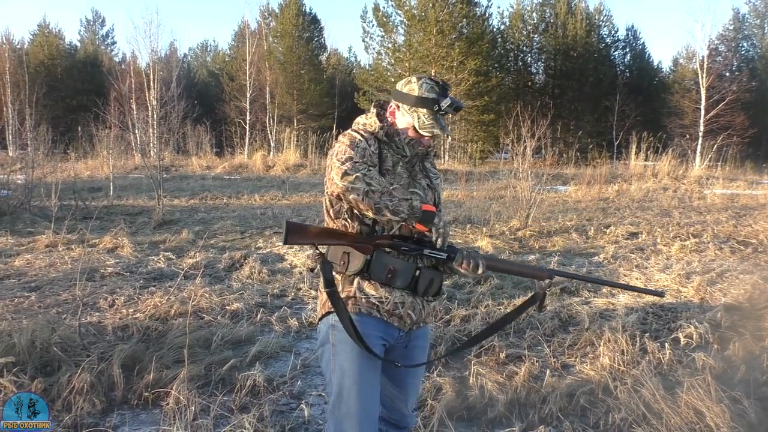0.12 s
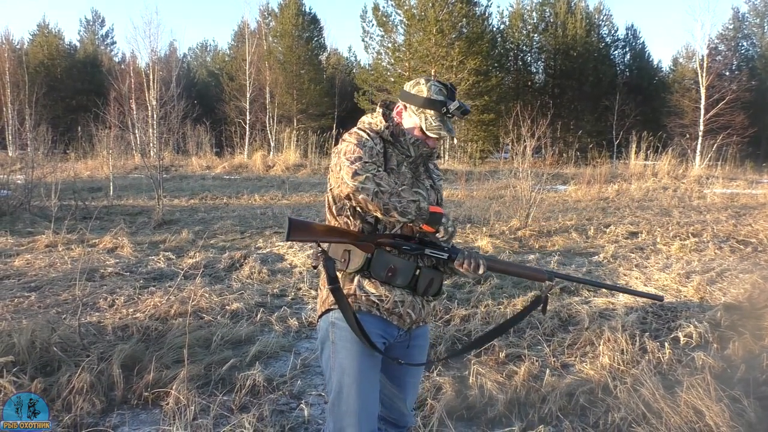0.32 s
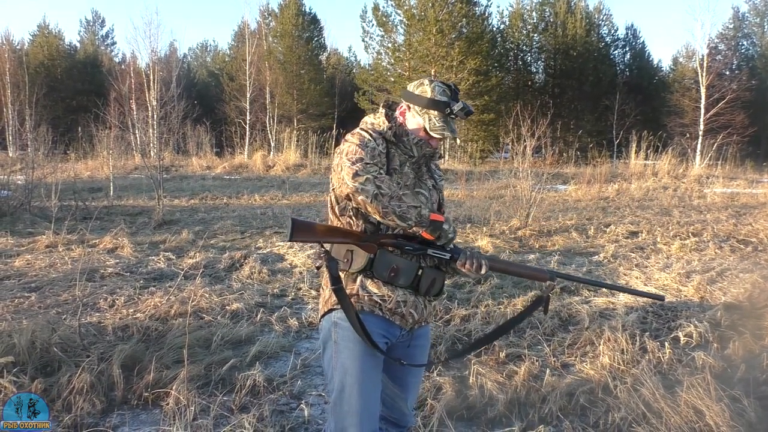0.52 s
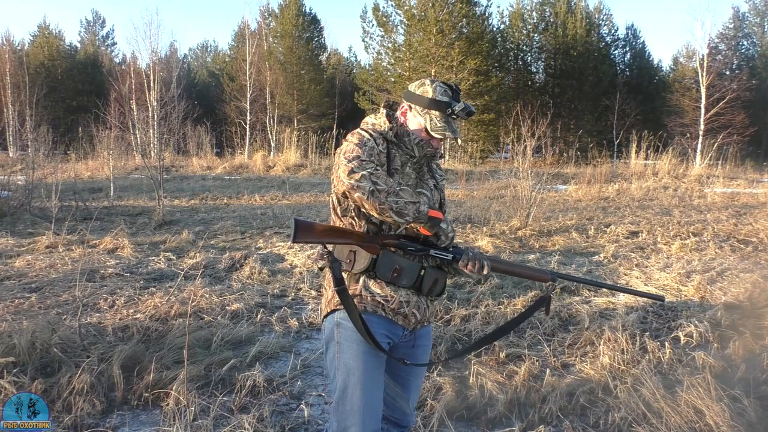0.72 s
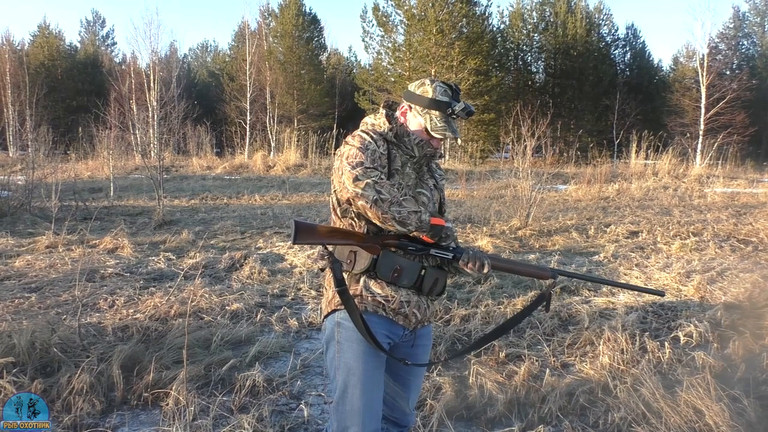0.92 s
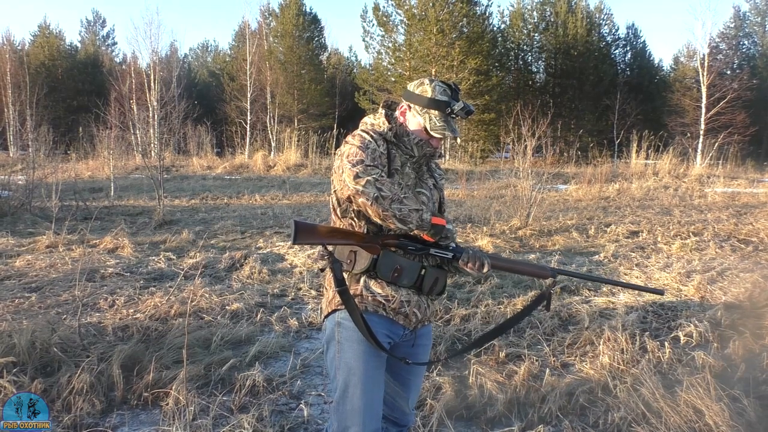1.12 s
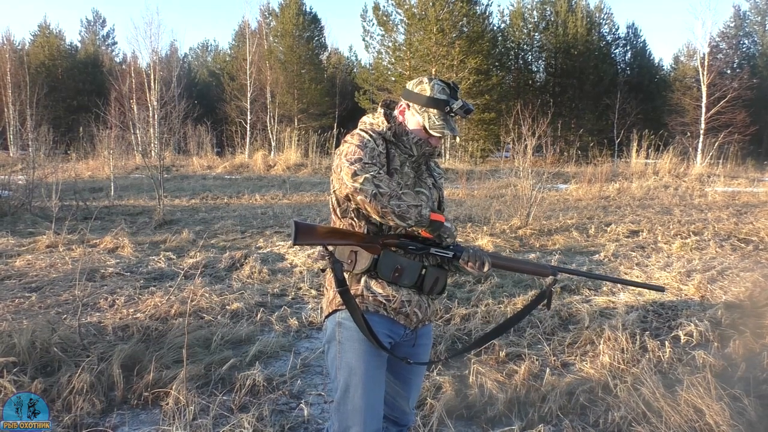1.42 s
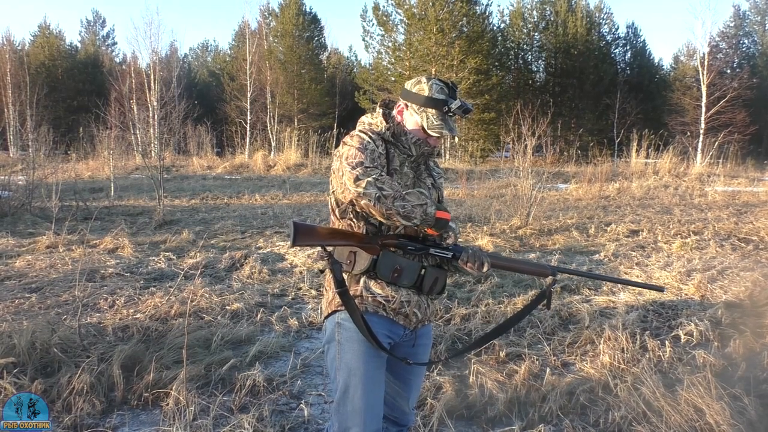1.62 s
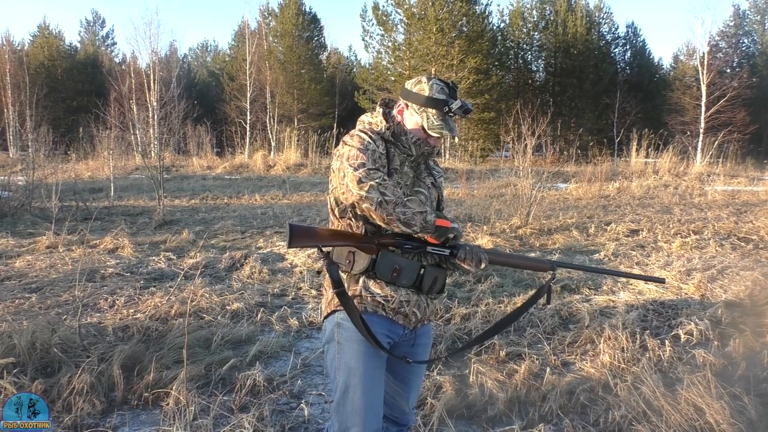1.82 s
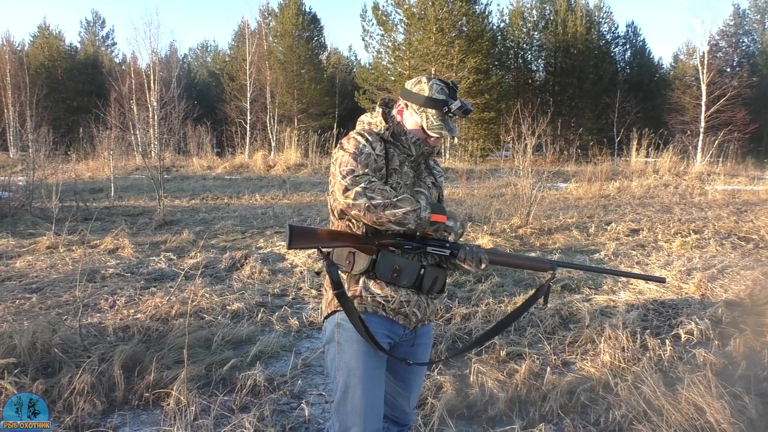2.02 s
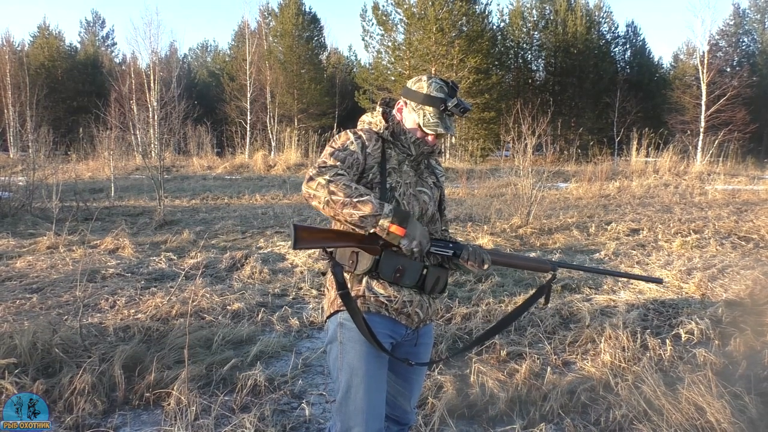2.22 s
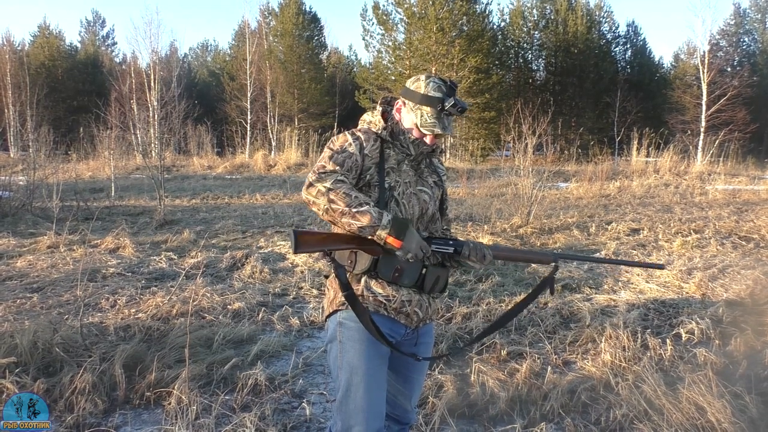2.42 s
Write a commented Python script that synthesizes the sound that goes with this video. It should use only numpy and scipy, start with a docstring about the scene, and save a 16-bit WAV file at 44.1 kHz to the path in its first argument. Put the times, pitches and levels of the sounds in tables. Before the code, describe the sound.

Shotgun handling in an open field, dry and echo-free: soft scrapes and small shell clicks come first, then a sharp snap and a rapid hard clack-clack of the steel action, over low wind buffeting and faint hiss.

```python
"""An open field: a shotgun is handled. Shells rub and tick at the loading port, then the action clacks and slides.
Blows are short bursts of noise and rubs are crowds of tiny catches; both make the steel parts ring briefly.
Single notes sing out of some of the blows, two blows also thump, and a thin ring is fading at the start.
Wind, made of low noise and single puffs, buffets the microphone over a faint steady hiss of filtered noise."""
import sys
import numpy as np
from scipy import signal
from scipy.fft import rfft, irfft
from scipy.io import wavfile
from scipy.ndimage import uniform_filter1d

SR = 44100
rng = np.random.default_rng(int(sys.argv[2]) if len(sys.argv) > 2 else 0)


def wrap_up_sound(samples):
    """Save the sound to the file named by the first command line argument, as 16-bit audio."""
    columns = np.atleast_2d(samples).T
    # keep every value between -1 and 1, then stretch to whole-number steps
    tamed = np.clip(columns, -1, 1)
    steps = np.round(tamed * 32767).astype(np.int16)
    wavfile.write(sys.argv[1], SR, steps)


def gain_from_db(level_db):
    """Convert decibel levels to linear amplitude factors (20 dB per decade)."""
    decades = np.asarray(level_db, float) / 20
    return 10 ** decades


N = 112455  # length of the scene in samples

# colour of the steady hiss (frequency [Hz], relative level [dB])
HISS_COLOUR = [(240, -38), (400, -18), (475, -23), (529, -16.5), (555, -5), (638, 3.5), (858, -10.5),
               (1070, 3), (1650, -8), (2020, -9), (2550, -14.5), (3590, -10.5), (4000, -14.5), (4400, -14),
               (6000, -15.5), (6390, -7), (7580, -9.5), (9420, 0.5), (12900, -0.5), (15700, -7),
               (16500, -22)]
HISS_DB = -61
RUSTLE_DB, RUSTLE_PER_S, RUSTLE_TOP_HZ = 2.2, 8, 7000  # swell of the field rustle, its pace, its upper limit

# rise and fall of the wind (time [s], level [dB])
GUSTS = [(0.0, -45.5), (0.13, -39), (0.4, -36), (0.92, -32), (1.28, -34.5), (1.46, -31), (1.6, -33),
         (1.91, -36), (2.09, -41.5), (2.27, -37.5), (2.4, -43), (2.55, -35.5)]
# colour of the wind on the microphone (frequency [Hz], relative level [dB])
WIND_COLOUR = [(11, -58), (18, 0.5), (37, -18), (87, 1), (178, -2), (296, -17.5), (346, -25.5), (421, -57),
               (458, -45), (520, -73.5), (680, -98.5), (1140, -120)]
# single puffs of wind (centre [s], level before the microphone's low cut [dB], frequency [Hz], length [cycles])
WIND_PUFFS = [(0.211, -21, 124, 0.74), (0.323, -22.5, 134, 0.64), (0.39, -17.5, 141, 0.75),
              (0.403, -19.5, 131, 0.69), (0.481, -19.5, 135, 0.96), (0.506, -24.5, 156, 0.75),
              (0.523, -20.5, 155, 0.77), (0.589, -25.5, 126, 2.9), (0.642, -41, 120, 0.32),
              (0.741, -20, 154, 2.27), (0.761, -16, 137, 0.53), (0.781, -24.5, 184, 3.8),
              (0.841, -18, 143, 1.25), (0.875, -21.5, 153, 1.3), (0.889, -15.5, 144, 1.2),
              (0.907, -13, 159, 0.63), (0.93, -15, 167, 1.5), (0.951, -15.5, 95, 0.28),
              (0.967, -20, 157, 2.1), (0.985, -24, 99, 0.39), (1.014, -24, 174, 2), (1.043, -34, 105, 0.6),
              (1.115, -29, 157, 0.6), (1.148, -26.5, 161, 1), (1.189, -25, 165, 0.7),
              (1.213, -23, 116, 1.23), (1.248, -18, 151, 0.74), (1.266, -19, 121, 0.89),
              (1.299, -25.5, 120, 0.4), (1.328, -19.4, 103, 1.47), (1.39, -24, 139, 0.5),
              (1.407, -26.5, 147, 2.3), (1.431, -23, 133, 0.78), (1.461, -15, 112, 0.95),
              (1.488, -19.5, 105, 0.86), (1.508, -23.8, 138, 1.3), (1.535, -21.5, 147, 0.59),
              (1.547, -23.5, 110, 1.1), (1.584, -23.5, 174, 1), (1.607, -26, 135, 0.91),
              (1.641, -18, 153, 0.82), (1.656, -27, 116, 0.64), (1.676, -25, 125, 2),
              (1.777, -23, 130, 0.58), (2.02, -26, 131, 1.23), (2.095, -22, 172, 0.89),
              (2.155, -21.5, 147, 0.53), (2.185, -24, 101, 1.9), (2.201, -25.5, 149, 0.61),
              (2.219, -23.5, 171, 1.05), (2.236, -25, 148, 1.03), (2.266, -32, 100, 0.66),
              (.055, -30, 95, 1.3), (.30, -28, 120, 1.1), (2.40, -33, 150, 1.1), (2.505, -33, 150, 1.1)]
FLUTTER_DB, FLUTTER_PER_S = 2.5, 32
MIC_LOW_HZ = 42  # the microphone halves a puff's strength here

# an earlier blow still fading at the start
FADING_HZ, FADING_DB, FADING_T60_S, FADING_WIDTH_HZ = 3860, -71, .5, 18

# natural notes of the steel receiver, shared by every blow and rub
# (frequency [Hz], level before scatter [dB], time to fall 60 dB [s])
STEEL_MODES = [(1430, -12, .025), (1800, -15, .025), (2304, -22, 0.13), (2620, -1, 0.029),
               (3318, -0.5, 0.024), (3940, -19, 0.023), (4030, -13, .08), (5500, -8, .03),
               (6300, -4, 0.053), (7190, -10, .03), (8580, -16, .18), (9970, -7, .04), (10330, 2.5, 0.012),
               (11400, -6, 0.05)]
MODE_SCATTER_DB = 1.5
PAIR_SPLIT_HZ, PAIR_SPREAD_HZ = 52.5, 35  # each mode is a close beating pair: mean split and its scatter
RING_LOW_HZ = 900  # the ring is halved in strength here and weaker below
BLOW_RING_DB, RUB_RING_DB = -37.5, -18.5
TAIL_DB, TAIL_T60_S = -41, 0.032  # noisy tail after each snap
LEAD = 256  # samples of silence before a push

# colour of the bare snap of a metal contact (frequency [Hz], gain [dB])
SNAP_COLOUR = [(500, -60), (900, -27), (1400, -7.5), (2130, 0), (3500, 3.5), (4140, 4.5), (5000, -7.5),
               (5620, -0.5), (6860, 4.5), (8040, -0.5), (8940, -5), (11300, 4), (12900, -7), (13900, 1),
               (16000, -4), (19000, -28)]
# colour of the plastic shell's tick (frequency [Hz], gain [dB])
SHELL_COLOUR = [(500, -21), (1000, -9), (1500, -10), (2400, -6), (2800, -5.5), (3250, 3.5), (4200, -19.5),
                (5000, -15), (6300, -1.5), (7500, -2.5), (11000, 2), (16000, -13)]

# rubbing and sliding (start [s], length [s], level [dB], brightest frequency [Hz], spread [octaves])
RUB_EVENTS = [(1.779, .016, -56, 8000, .9), (.46, .05, -68, 3700, .15), (2.21, .13, -75, 6000, 1.2),
              (2.39, .15, -73, 6000, 1.6), (-.1, 0.37, -71, 6300, 0.75), (0.148, 0.33, -75, 1600, .9),
              (0.451, .36, -78, 6140, 0.66), (1.927, 0.026, -56, 4500, .5), (0.4, 0.16, -67, 3070, 0.2),
              (.42, 0.098, -68.5, 2750, 0.15), (0.396, 0.18, -69, 6050, 0.32), (.70, .13, -69.5, 6400, .12),
              (0.883, 0.22, -72, 6370, 0.15), (1.518, 0.022, -57, 6300, 0.94),
              (1.89, .029, -49.5, 6000, .7), (1.913, .027, -47, 4710, .6), (1.933, 0.017, -50, 6300, 0.14),
              (1.962, 0.0087, -49, 10000, .4), (1.988, 0.03, -68, 2000, 1.3), (.225, .04, -74, 1800, .8),
              (.335, .05, -70, 1500, .8), (.95, .08, -75, 1700, .6), (1.5, .09, -66, 1200, .5),
              (1.99, .06, -68, 900, .5)]
RUB_GRAINS_PER_S, RUB_SCATTER_DB = 6000, 2.2  # catches, and the mean random boost of one catch
RUB_LEAN = .65  # below 1, a rub swells faster than it fades

# faint ticks of a shell at the port
# (time [s], level [dB], brightest frequency [Hz], spread [octaves], contact time [s])
SHELL_TICKS = [(.1620, -59, 3200, 0.53, 0.0015), (.2335, -51.5, 2220, 1.1, 0.0037),
               (.2988, -44, 5000, 1.4, 0.0019), (.3492, -49.5, 1800, 1.4, 0.0027),
               (.4400, -49, 5030, 1.1, .002), (.4800, -54, 4030, 1.34, 0.0035),
               (.5100, -55.5, 6900, 1.2, 0.0071), (.5450, -53, 4000, 1.24, 0.0018),
               (.7528, -64, 7100, 0.57, .002), (.8050, -65, 2800, 0.77, .002),
               (.9100, -57, 7100, 0.48, 0.008), (.9610, -66, 2000, 0.4, 0.0022),
               (.9947, -43, 5000, 1.6, 0.0012), (1.0000, -46.5, 7000, 1.5, .003),
               (1.0980, -60, 3500, 0.56, 0.0028)]
# blows of metal on metal
# (time [s], level [dB], brightest frequency [Hz], spread [octaves], contact time [s])
METAL_CLACKS = [(1.5290, -45, 8000, 2.2, .002), (1.5480, -21, 5500, 1.5, 0.0011),
                (1.5512, -34, 3960, 0.65, 0.0018), (1.5560, -41, 2500, 1.8, 0.003),
                (1.7690, -54.5, 2490, .8, 0.0029), (1.7835, -44, 4000, 0.42, 0.0025),
                (1.7855, -31, 3280, .8, .0012), (1.7922, -33, 4000, 0.54, 0.00062),
                (1.7948, -10.5, 9000, 2.6, .0006), (1.8025, -46, 1500, .5, .002),
                (1.7985, -33.5, 6000, 1.8, 0.00098), (1.8742, -45, 8000, 1.5, 0.0011),
                (1.8890, -46, 5090, 0.75, 0.0037), (1.8940, -35, 6500, .8, .004),
                (1.8962, -30, 4050, .15, 0.0025), (1.8960, -38, 10000, .3, .003),
                (1.9150, -38, 4500, 0.45, 0.0022), (1.9180, -36, 4500, 0.4, 0.0012),
                (1.9215, -41, 5000, .5, .0012), (1.9255, -41, 4500, .7, .0012),
                (1.9300, -43, 5000, .7, .0012), (1.9350, -44, 4000, .8, .0012),
                (1.9420, -39, 4000, 0.87, .002), (1.9480, -15.5, 5960, 0.78, 0.0004),
                (1.9495, -8.5, 9500, 1.1, 0.0004), (1.9512, -23, 9500, 1.3, .002),
                (1.9535, -27, 8000, 1.0, .002), (1.9575, -33, 7100, 0.72, 0.0018),
                (1.9790, -23, 4500, 1.4, 0.001), (1.9815, -29, 3400, .3, .0015),
                (1.9812, -28, 9000, .7, .0015), (1.9860, -33, 8000, 1.1, 0.00099),
                (1.9910, -46, 2480, 1.1, 0.0012), (1.9950, -47, 2000, 1.1, .0012),
                (1.9990, -50, 2000, 1.1, .0012), (2.0389, -58, 6000, .8, 0.0017)]
FIRST_TOUCH = .45  # strength of the sharp first contact against the chatter after it

# single notes that sing out of some of the blows
# (time [s], level [dB], frequency [Hz], time to fall 60 dB [s], glide [Hz per ms])
SINGING_MODES = [(1.5482, -29, 2410, .014, 0), (1.5482, -36, 3670, .02, 0), (1.5485, -36, 4170, .02, 0),
                 (1.5485, -34, 5580, .018, 0), (1.5482, -36, 10600, .012, 0), (1.5482, -36, 12100, .012, 0),
                 (1.5300, -47, 1300, .03, 0), (1.5560, -50, 1400, .05, 0), (1.7955, -44, 640, .02, 0),
                 (1.7950, -27, 1790, .022, 0), (1.7950, -27, 3140, .014, 0), (1.7950, -22, 3900, .012, 0),
                 (1.7950, -25, 4550, .01, 0), (1.7950, -11.5, 6650, .005, 0), (1.7950, -27, 2500, .008, 0),
                 (1.7950, -27, 11900, .008, 0), (1.7950, -20, 7930, .009, 0), (1.7950, -25, 9890, .01, 0),
                 (1.8930, -36, 3300, .02, 90), (1.8950, -21, 3750, .025, 60), (1.9170, -38, 3900, .03, 0),
                 (1.9160, -43, 6300, .05, 0), (1.9170, -46, 2730, .04, 0), (1.9495, -21, 11440, .022, 0),
                 (1.9495, -26, 5460, .012, 0), (1.9495, -27, 7170, .014, 0), (1.9500, -31, 3870, .02, 0),
                 (1.9495, -31, 2560, .016, 0), (1.9500, -29, 8420, .025, 0), (1.9500, -29, 10130, .025, 0),
                 (1.9490, -42, 1000, .012, 0), (1.9530, -45, 1400, .04, 0), (1.9790, -22.5, 3390, .02, 0),
                 (1.9790, -33, 6300, .022, 0), (1.9800, -31, 9760, .025, 0), (1.9800, -30, 10170, .018, 0),
                 (1.9795, -42, 1340, .025, 0)]
PING_RISE_S = .0006

# low push of air or stock under two of the blows (centre [s], signed height [1], half-width to 1/e [s])
LOW_THUMPS = [(1.7975, -.41, .0016), (1.8973, -.1, .002), (1.9007, .1, .002)]

CEILING, KNEE = .6, 6  # level that rounded peaks approach, and how late the rounding sets in


def unit(x):
    """Scale a sound to an average (rms) strength of 1."""
    return x / np.sqrt(np.mean(x ** 2) + 1e-30)


def colour(x, gain):
    """Filter by a gain given as a function of frequency in Hz."""
    hz = np.maximum(np.fft.rfftfreq(len(x), 1 / SR), 1)
    return irfft(rfft(x) * gain(hz), len(x))


def spectrum(points):
    """Turn (Hz, dB) points into a gain by frequency, silent outside them."""
    hz, db = np.array(points).T
    return lambda f: gain_from_db(np.interp(np.log(f), np.log(hz), db, -200, -200))


def noise(points):
    """Make steady noise with the colour of the (Hz, dB) points."""
    return unit(colour(rng.standard_normal(N), spectrum(points)))


def walk(rate):
    """Wander between random levels: each is held for 1 / rate seconds, then all are smoothed twice."""
    hold = int(SR / rate)
    steps = np.repeat(rng.standard_normal(N // hold + 1), hold)
    smooth = uniform_filter1d(uniform_filter1d(steps, hold), hold)
    return unit(smooth[:N])


def add(out, x, start_s):
    """Mix x into out from start_s on, cutting what falls outside."""
    i = int(start_s * SR)
    x = x[max(-i, 0):N - i]
    out[max(i, 0):max(i, 0) + len(x)] += x


def hiss():
    """Steady treble hiss over a field rustle that swells and sinks."""
    air = noise(HISS_COLOUR)
    rustle = colour(air, lambda f: 1 / (1 + (f / RUSTLE_TOP_HZ) ** 8))
    treble = air - rustle
    swell = gain_from_db(RUSTLE_DB * (walk(RUSTLE_PER_S) - .5))
    return gain_from_db(HISS_DB) * (treble + rustle * swell)


def wind():
    """Low turbulence that flutters under the gusts, with stronger single puffs, most of a cycle or two or less."""
    t = np.arange(N) / SR
    gust_s, gust_db = np.array(GUSTS).T
    level_db = np.interp(t, gust_s, gust_db) + FLUTTER_DB * walk(FLUTTER_PER_S)
    turbulence = noise(WIND_COLOUR) * gain_from_db(level_db)
    puffs = np.zeros(N)
    for (s, db, hz, cycles), phase in zip(WIND_PUFFS, rng.random((len(WIND_PUFFS), 1))):
        # time counted in cycles from the middle of the puff
        u = np.arange(int(4 * cycles / hz * SR)) / SR * hz - 2 * cycles
        swell = np.exp(-2 * (u / cycles) ** 2)
        puff = gain_from_db(db) * swell * np.cos(2 * np.pi * (u + phase))
        add(puffs, puff, s - 2 * cycles / hz)
    return turbulence + colour(puffs, lambda f: f ** 2 / (f ** 2 + MIC_LOW_HZ ** 2))


def fading():
    """A thin, slightly blurred ring, made of very narrow noise, dies away."""
    line = colour(rng.standard_normal(N), lambda f: np.exp(-((f - FADING_HZ) / FADING_WIDTH_HZ) ** 2))
    decay = 1000. ** (-np.arange(N) / SR / FADING_T60_S)
    return gain_from_db(FADING_DB) * unit(line) * decay


def steel(push, hz, octaves, ring_db, seed, snap_colour=SNAP_COLOUR):
    """A push is heard as a snap with a short noisy tail and rings the modes near its brightest frequency."""
    t = np.arange(len(push)) / SR

    def bell(f):
        return np.exp(-.5 * (np.log2(f / hz) / octaves) ** 2)

    ring = np.zeros(len(t))
    # the random seed changes each mode's strength and its beating for every push
    for (mode_hz, db, t60), a, b in zip(STEEL_MODES, seed, seed[::-1]):
        strength = gain_from_db(db + MODE_SCATTER_DB * a) * bell(mode_hz)
        beating = np.cos(np.pi * (PAIR_SPLIT_HZ + PAIR_SPREAD_HZ * b) * t)
        ring += strength * np.sin(2 * np.pi * mode_hz * t) * 1000. ** (-t / t60) * beating
    tail = gain_from_db(TAIL_DB) * seed * 1000. ** (-t / TAIL_T60_S)
    push = np.roll(push, LEAD)
    snap = push + signal.fftconvolve(push, tail)[:len(t)]
    snap = colour(snap, lambda f: bell(f) * spectrum(snap_colour)(f))
    rung = signal.fftconvolve(push, ring)[:len(t)]
    rung = colour(rung, lambda f: 1 / (1 + (RING_LOW_HZ / f) ** 4))
    return snap + gain_from_db(ring_db) * rung


def rubs():
    """Dense tiny catches of uneven size swell and fade through the same steel."""
    out, t = np.zeros(N), np.arange(16384) / SR
    for s, length, db, hz, octaves in RUB_EVENTS:
        chance, luck = rng.random((2, len(t)))
        kick, seed = rng.standard_normal((2, len(t)))
        caught = chance < RUB_GRAINS_PER_S / SR
        grains = caught * kick * gain_from_db(-RUB_SCATTER_DB * np.log(luck + 1e-9))
        swell = np.sin(np.pi * np.clip(t / length, 0, 1) ** RUB_LEAN)
        y = steel(grains * swell, hz, octaves, RUB_RING_DB, seed)
        loudness = np.sqrt(np.sum(y ** 2) / (length * SR))
        add(out, gain_from_db(db) * y / loudness, s - LEAD / SR)
    return out


def pings():
    """Single modes are decaying sines with a quick rise; a sliding part bends the pitch."""
    out, t = np.zeros(N), np.arange(4096) / SR
    for (s, db, hz, t60, glide), phase in zip(SINGING_MODES, rng.random((len(SINGING_MODES), 1))):
        turns = hz * t + 500 * glide * t ** 2 + phase  # 500 = 1000 ms per s, halved by adding up the glide
        shape = (1 - np.exp(-t / PING_RISE_S)) * 1000. ** (-t / t60)
        add(out, gain_from_db(db) * shape * np.sin(2 * np.pi * turns), s)
    return out


def thumps():
    """Low pushes are smooth one-sided pressure bumps."""
    t = np.arange(N) / SR
    return sum(size * np.exp(-((t - s) / width) ** 2) for s, size, width in LOW_THUMPS)


def blows(table, snap_colour):
    """Each contact is a sharp touch, then a burst of chatter that dies away at the pace of its contact time."""
    out, t = np.zeros(N), np.arange(12288) / SR
    for s, db, hz, octaves, contact in table:
        chatter, seed = rng.standard_normal((2, len(t)))
        shape = np.minimum(4 * t / contact, 1) * np.exp(-t / contact)
        push = chatter * shape
        push[0] = FIRST_TOUCH * np.sqrt(np.sum(shape ** 2))
        y = steel(push, hz, octaves, BLOW_RING_DB, seed, snap_colour)
        # the level is set by the first moments of the blow
        head = y[LEAD:LEAD + int(1.5 * contact * SR)]
        add(out, gain_from_db(db) * y / (2 * np.std(head)), s - LEAD / SR)
    return out


def scene():
    """Gun, wind and the steady hiss of field and microphone."""
    clacks = blows(METAL_CLACKS, SNAP_COLOUR)
    ticks = blows(SHELL_TICKS, SHELL_COLOUR)
    gun = clacks + ticks + rubs() + thumps() + fading() + pings()
    return (gun + wind() + hiss())[None]


def roll_off(x):
    """The treble ends steeply here."""
    return signal.sosfilt(signal.butter(12, 16830, fs=SR, output="sos"), x)


def record(dry):
    """The camera rounds the sharpest peaks towards a ceiling."""
    rounded = dry / (1 + (dry / CEILING) ** KNEE) ** (1 / KNEE)
    return roll_off(rounded)


dry = scene()
out = record(dry)
wrap_up_sound(out)
```